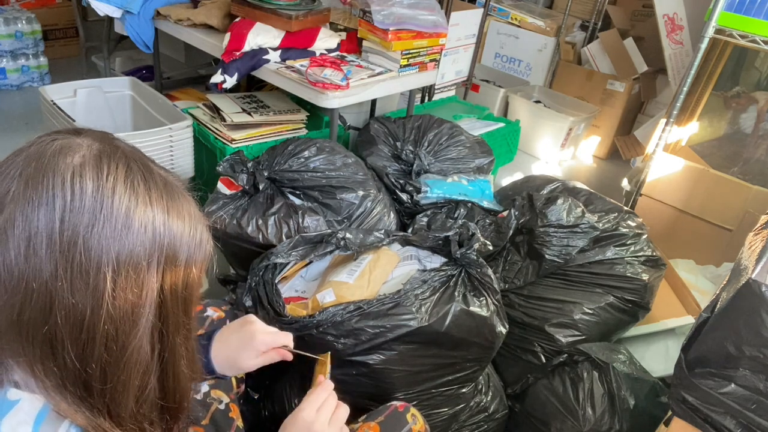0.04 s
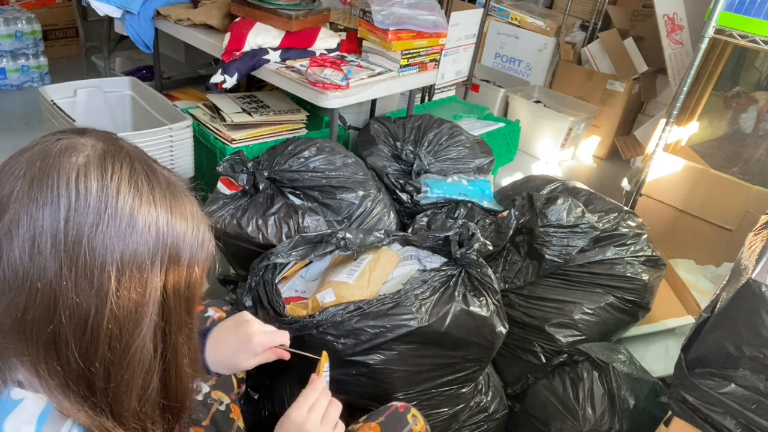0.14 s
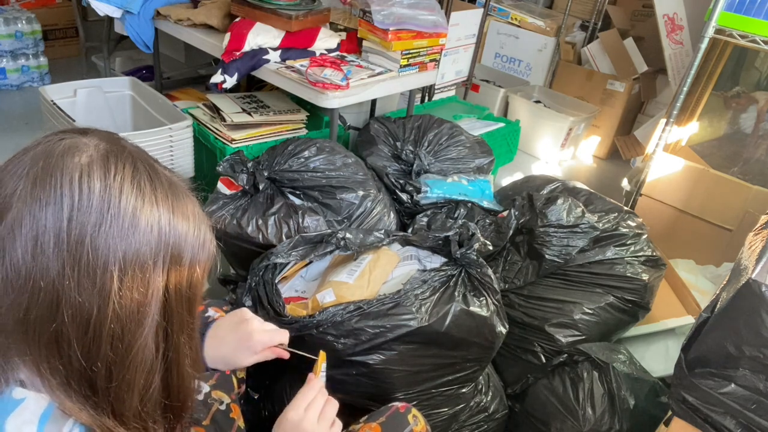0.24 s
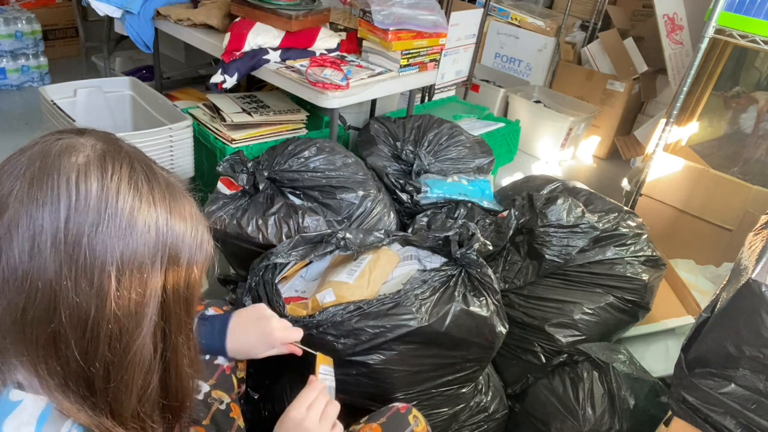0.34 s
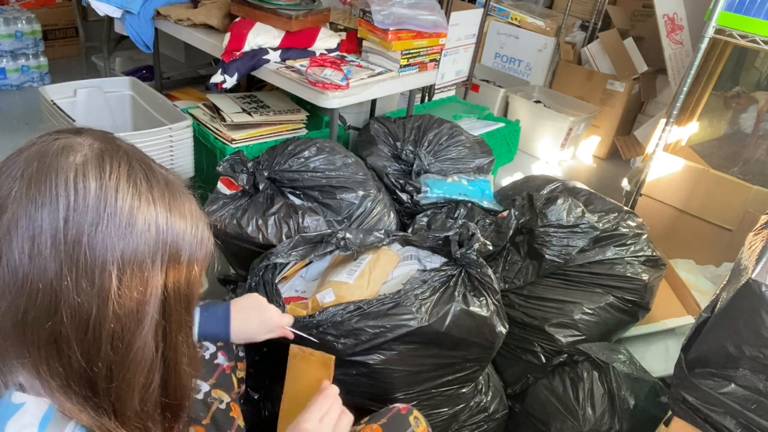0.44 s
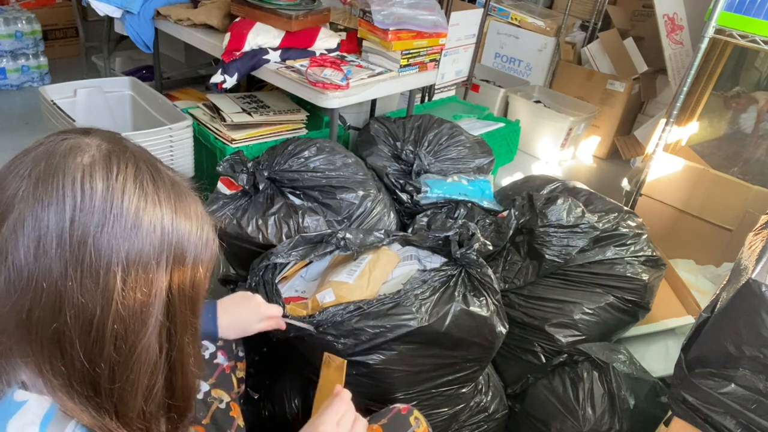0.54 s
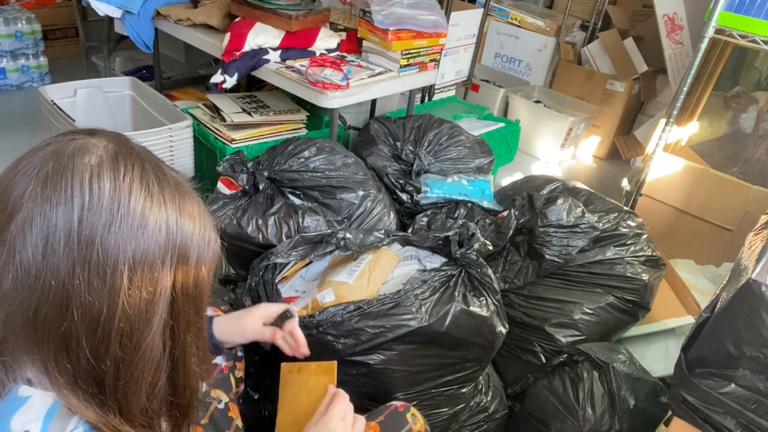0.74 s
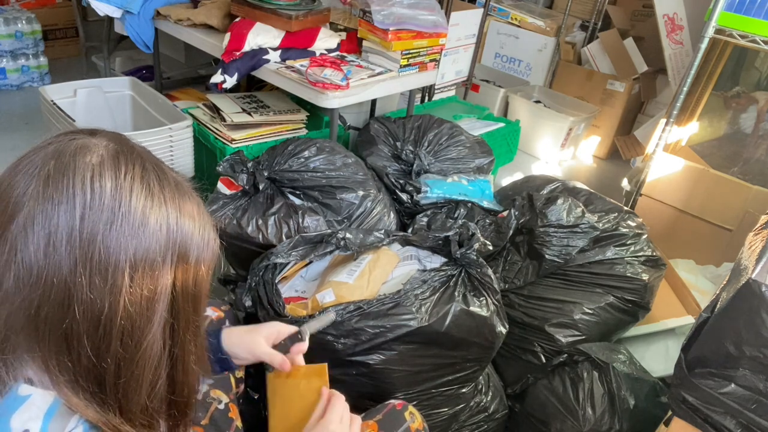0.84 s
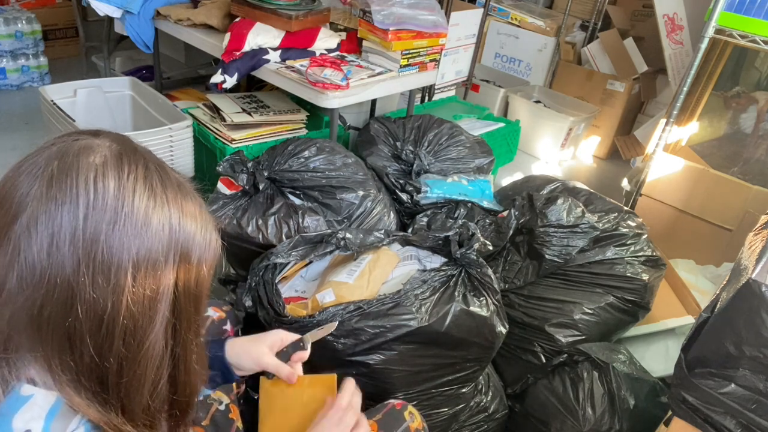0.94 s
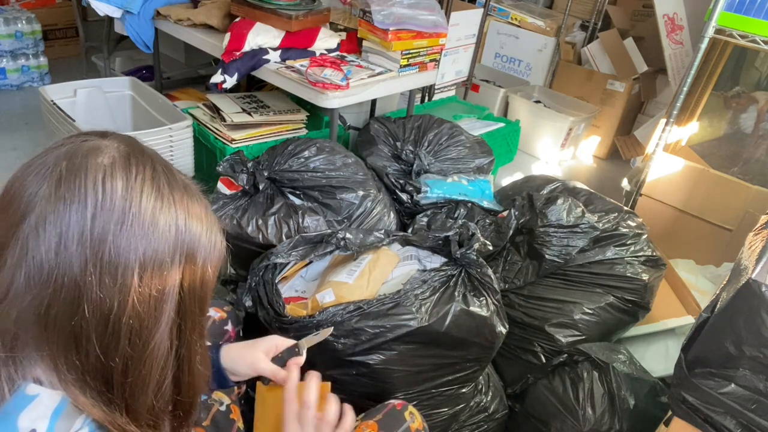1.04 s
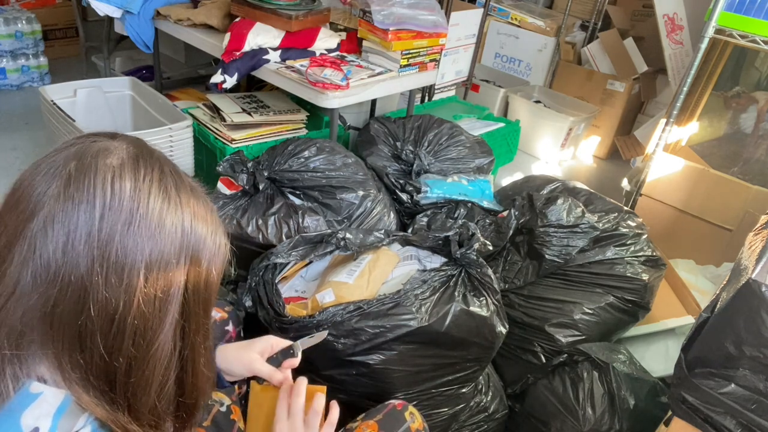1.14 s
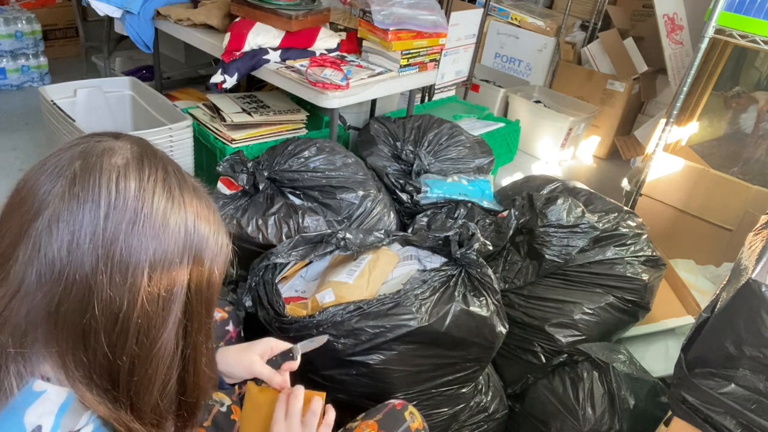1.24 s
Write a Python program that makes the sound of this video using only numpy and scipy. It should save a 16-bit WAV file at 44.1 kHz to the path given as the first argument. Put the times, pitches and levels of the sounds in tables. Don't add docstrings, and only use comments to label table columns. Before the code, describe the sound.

Envelope slitting heard close up: faint handling ticks, a hollow papery knock, a brief dense tear, near quiet, then growing crinkles with separate small snaps, in a short damped room over very low distant rumble.

```python
import sys
import numpy as np
from scipy import signal
from scipy.fft import rfft, irfft, next_fast_len
from scipy.io import wavfile
from scipy.ndimage import uniform_filter1d

SR = 44100
rng = np.random.default_rng(int(sys.argv[2]) if len(sys.argv) > 2 else 0)


def master(y):
    cut = np.clip(np.atleast_2d(y).T, -1, 1)
    pcm = np.round(cut * 32767)
    wavfile.write(sys.argv[1], SR, pcm.astype(np.int16))


def invert_db(x):
    u = np.asarray(x, float) / 20
    return 10 ** u


N = 57330
T = np.arange(N) / SR
SIZE = next_fast_len(N + SR // 4)
HZ = np.maximum(np.arange(SIZE // 2 + 1) * SR / SIZE, 1)


def along(table, hz=HZ):
    table_hz, value = np.array(table).T
    return np.interp(np.log(hz), np.log(table_hz), value)


def shaped(x, gain):
    return irfft(rfft(x, SIZE) * gain, SIZE)[..., :N]


def unit(x):
    return x / np.sqrt(np.mean(x ** 2))


def walk(rate_per_s):
    hold = int(SR / rate_per_s)
    steps = np.repeat(rng.standard_normal(N // hold + 1), hold)
    return unit(uniform_filter1d(steps, hold)[:N])


def diffuse():
    # pitch_hz, likeness (0-1)
    likeness = [(50, .96), (250, .4), (1500, .05), (6000, .05), (7500, .998), (15000, .998)]
    like = np.clip(along(likeness), 0, .999)
    mid, side = rng.standard_normal((2, N))
    mid = shaped(mid, np.sqrt((1 + like) / 2))
    side = shaped(side, np.sqrt((1 - like) / 2))
    return np.array([mid + side, mid - side])


def hum(pitch_hz):
    pitch = pitch_hz * (1 + .04 * walk(19))
    return np.sqrt(2) * np.sin(2 * np.pi * np.cumsum(pitch) / SR)


def rumble():
    # start_s, level_db
    swell = [(0.0, -39), (0.132, -74), (0.278, -66.5), (0.31, -58), (0.376, -41), (0.44, -55.5),
             (0.506, -46), (0.672, -61), (0.744, -78.5), (0.822, -44), (0.97, -53), (1.028, -73.5),
             (1.086, -48), (1.23, -55), (1.262, -47), (1.3, -59.5)]
    # pitch_hz, level_db (per Hz)
    air_colour = [(20, -46), (35, -20.5), (60, -5.5), (90, -18.5), (120, -26), (250, -39), (450, -49.5),
                  (15500, -69)]
    lower = invert_db(np.interp(T, *np.array(swell).T)) * hum(51.3)
    upper = invert_db(-63 + 5.1 * walk(5.5)) * hum(66.6)
    air = invert_db(-53.5) * unit(shaped(diffuse(), invert_db(along(air_colour))))
    return lower + upper + air


def fade(t60_s):
    rate = np.log(1000) / t60_s
    return np.exp(-rate * T) * np.sqrt(2 * rate / SR)


def room(x):
    gap_s, early_db, late_db = .003, -4, -3.5
    tail = diffuse() * (T > gap_s)
    low = shaped(tail, 1 / (1 + (HZ / 2500) ** 2))
    late = low * fade(0.28) + (tail - low) * fade(0.24)
    early = tail * fade(0.03)
    return shaped(x, rfft(invert_db(late_db) * late + invert_db(early_db) * early, SIZE))


def ring(pitch_hz, t60_s):
    push_turns = 0.42
    t = T[:SR // 10]
    decay = np.exp(-np.log(1000) * t / max(t60_s, 1e-3))
    push = 1 - np.exp(-t * pitch_hz / push_turns)
    return np.sin(2 * np.pi * pitch_hz * t) * decay * push


def pocket(x):
    # pitch_hz, level_db, t60_s (time to fall 60 dB)
    modes = [(280, -19.5, 0.12), (575.6, 3, .06), (720, -12.5, 0.15), (853, -1.5, .06), (1082, 4, 0.042),
             (1240, -2.5, 0.14), (1800, -4.5, 0.025), (2334, 8, 0.098), (2804, -4.5, 0.073),
             (3354, 8.5, 0.027)]
    body = sum(invert_db(db) * ring(hz, t60_s) for hz, db, t60_s in modes)
    return shaped(x, rfft(body / np.sqrt(np.sum(body ** 2)), SIZE))


def pops(events):
    tick_s, tick_top_hz = .0002, 8300
    pocket_db, pocket_lag_s = -11, .004
    out = np.zeros(N + SR)
    grit = rng.standard_normal((len(events), 200)) * np.exp(-T[:200] / tick_s)
    grit[:, 0] = 3
    grit = signal.lfilter(*signal.butter(1, tick_top_hz, fs=SR), grit)
    for (start_s, db, hz, t60_s, tick_db), tick in zip(events, grit):
        i = int(start_s * SR)
        out[i:i + SR // 10] += invert_db(db) * ring(hz, t60_s)
        out[i:i + len(tick)] += invert_db(db + tick_db) * tick / np.sqrt(np.sum(tick ** 2)) * 2
    out = out[:N]
    return out + invert_db(pocket_db) * pocket(np.roll(out, int(pocket_lag_s * SR)))


def crease_snaps():
    # start_s, level_db, pitch_hz, t60_s (ring), tick_db (against the ring)
    creases = [(.608, -68.5, 2630, 0.0081, -31), (.757, -44.5, 700, 0.0067, -21),
               (0.7575, -52.5, 3210, .006, 8.5), (0.798, -50, 3780, 0.0028, 11.5),
               (0.844, -41, 650, 0.0068, -6.5), (.921, -39, 1310, 0.0072, 0.5),
               (1.0652, -56.5, 1800, .006, 8.5), (1.0741, -26, 1697, 0.0043, -2),
               (1.077, -42.5, 280, 0.017, -31), (1.1624, -57, 4800, .003, 7),
               (1.1922, -48.5, 1480, 0.0083, 7), (1.1963, -53, 4830, 0.015, 4),
               (1.2153, -32.5, 1291, 0.011, -6.5), (1.237, -41.5, 1740, 0.0093, -4.5),
               (1.244, -40.5, 1840, .008, -2), (1.2506, -34.5, 2110, 0.0035, -18.5),
               (1.269, -39, 6700, .004, -7.5), (1.2859, -40.5, 1880, 0.0048, 10),
               (1.293, -46.5, 2200, .006, -1), (1.296, -42.5, 6890, 0.0054, 3.5)]
    return pops(creases)


def blade_knocks():
    # start_s, level_db, pitch_hz, t60_s (ring), tick_db (against the ring)
    knocks = [(0.015, -43, 1500, 0.0088, -4), (.043, -36.5, 1010, 0.0058, -16.5),
              (0.06, -49.5, 1940, 0.024, -29), (0.0682, -23.5, 896, 0.0057, -34.5),
              (.073, -37, 598.5, 0.012, -29.5), (0.195, -49.5, 1200, 0.016, -5.5),
              (.2172, -25, 5550, 0.012, 5), (0.2176, -16.5, 1830, 0.023, -5.5),
              (.2194, -6.5, 800, 0.01, -29), (.2225, -21, 529, 0.045, -31), (.221, -28, 274.8, 0.071, -30),
              (.366, -37.5, 805, 0.026, -26)]
    return pops(knocks)


def fibres(size_hz):
    breaks_per_s, scatter_db = 2500, 2.5
    broken = rng.random(N) < breaks_per_s / SR
    clicks = broken * rng.standard_normal(N) * invert_db(scatter_db * rng.exponential(size=N))
    chatter = invert_db(2.5 * walk(120))
    band = np.cos(np.pi / 2 * np.clip(np.log2(HZ / size_hz), -1, 1))
    return shaped(clicks * chatter, band)


def tearing():
    # start_s, effort_db, brightness_db
    stroke = [
        (.197, -67.5, -13),
        (.2085, -50.5, 1),
        (.211, -45.5, -9),
        (.222, -33, -3),
        (.262, -34, 3),
        (.292, -31, 3),
        (.319, -27.5, 0.5),
        (.345, -48.5, -8),
        (.385, -60, -11),
    ]
    # start_s, effort_db, brightness_db
    fingers = [
        [(0, -66.5, -15.5), (.05, -63.5, -4), (.09, -64.5, -5.5), (.13, -80, -11.5), (.19, -67.5, 10)],
        [(.725, -84, 26), (.738, -64.5, 26), (.792, -66.5, 3.5), (.808, -55, -2.5), (.84, -71, -7.5),
         (.91, -65.5, 6), (.95, -64.5, -5), (1.0, -69.5, 10.5), (1.05, -87.5, -6.5)],
        [(1.070, -71.5, -11), (1.079, -54.5, -4.5), (1.15, -76, -12.5), (1.188, -70, 7), (1.21, -55.5, -2.5),
         (1.25, -48.5, 0.5), (1.275, -55, 4.5), (1.3, -50, 2)],
    ]
    # pitch_hz, level_db (per Hz)
    fibre_colour = [(110, -14), (200, -22.5), (280, -8), (560, -7), (3000, -7), (5000, -13.5), (13500, -19),
                    (15500, -39)]
    sizes = [200, 400, 800, 1600, 3200, 6400, 12800]
    bright_hz, pocket_db = 2550, -20
    clicks = sum(fibres(hz) for hz in sizes) * invert_db(1.5 * walk(150))
    paper = unit(shaped(clicks, invert_db(along(fibre_colour)))) + invert_db(pocket_db) * unit(pocket(clicks))
    high = shaped(paper, 1 / (1 + (bright_hz / HZ) ** 2))
    low = paper - high
    out = 0
    for touch in [stroke, *fingers]:
        start_s, effort_db, bright_db = np.array(touch).T
        effort = invert_db(np.interp(T, start_s, effort_db, left=-140, right=-140))
        out = out + effort * (high + low * invert_db(-np.interp(T, start_s, bright_db)))
    return out


def scene():
    thin = signal.butter(3, 242, "high", fs=SR, output="sos")
    snap = signal.sosfilt(thin, crease_snaps() + blade_knocks())
    tear = tearing()
    return tear + snap + room(tear + invert_db(-2.5) * snap) + rumble()


def band_limit(x):
    return signal.sosfilt(signal.butter(12, 15810, fs=SR, output="sos"), x)


def record(dry):
    # pitch_hz, lead (radians)
    lead = [(20, 0), (860, -.6), (1400, .9), (2800, -.8), (4300, .6), (6700, -1.3), (7800, 0), (8300, 0),
            (10100, 3.14), (10900, 3.14), (12700, 6.28), (13300, 6.28), (14800, 9.42), (16000, 10.5)]
    # pitch_hz, level_db
    left_level = [(50, -1.7), (500, -1.2), (1500, 0), (15000, 0)]
    half_lead = np.interp(HZ, *np.array(lead).T) * 1j / 2
    half_level = along(left_level) * np.log(10) / 40
    turn = half_lead + half_level
    return band_limit(shaped(dry, np.exp(np.array([turn, -turn]))))


dry = scene()
out = record(dry)
master(out)
```